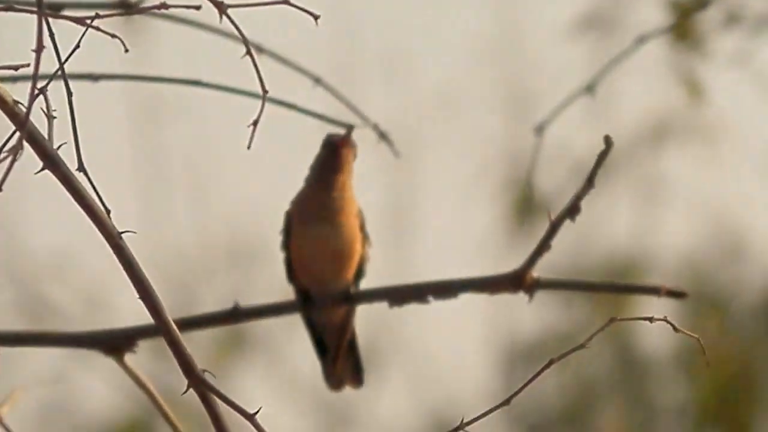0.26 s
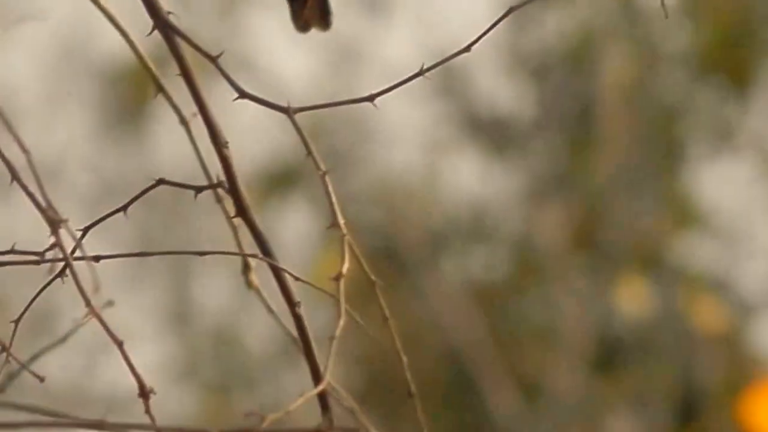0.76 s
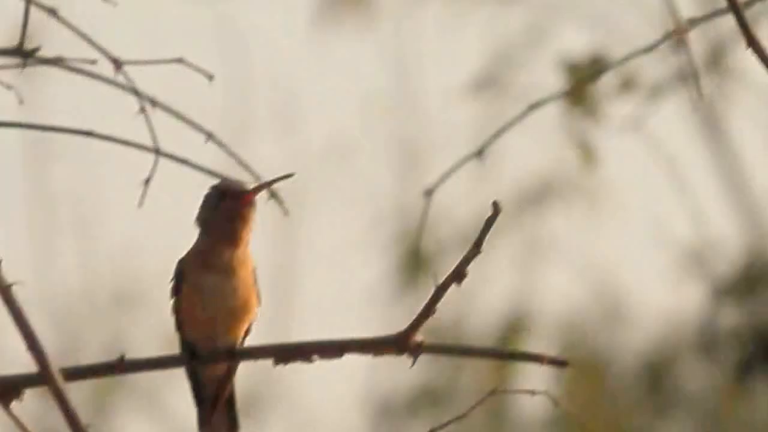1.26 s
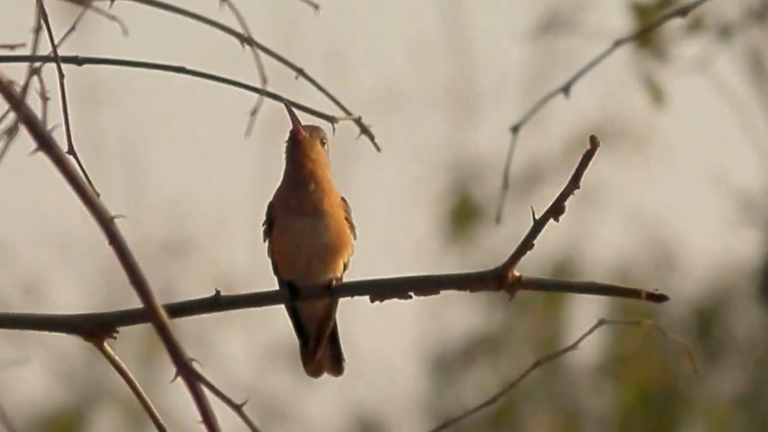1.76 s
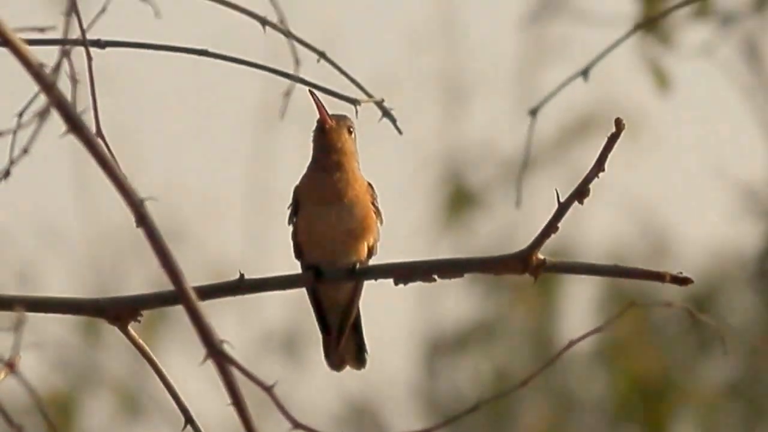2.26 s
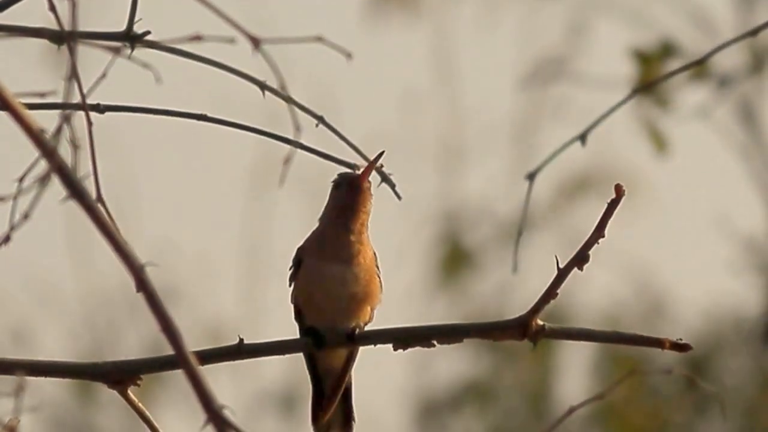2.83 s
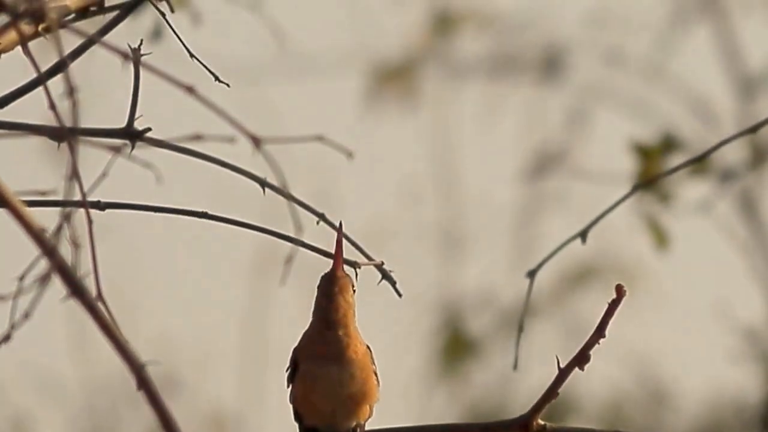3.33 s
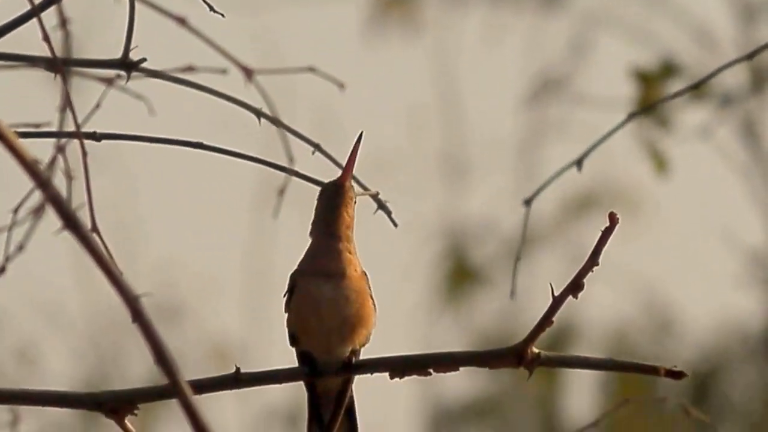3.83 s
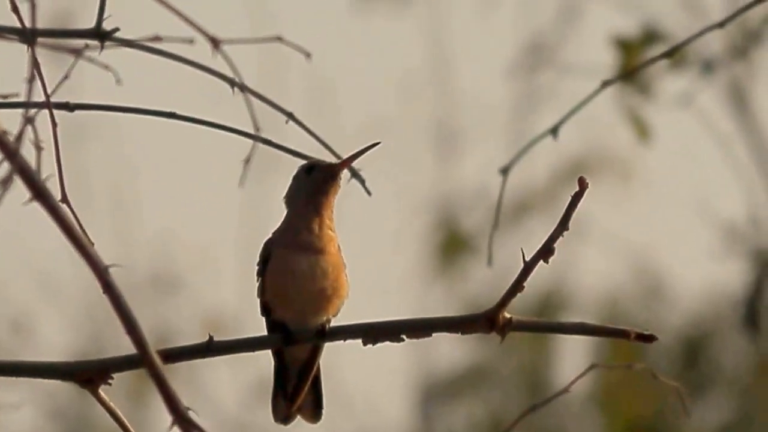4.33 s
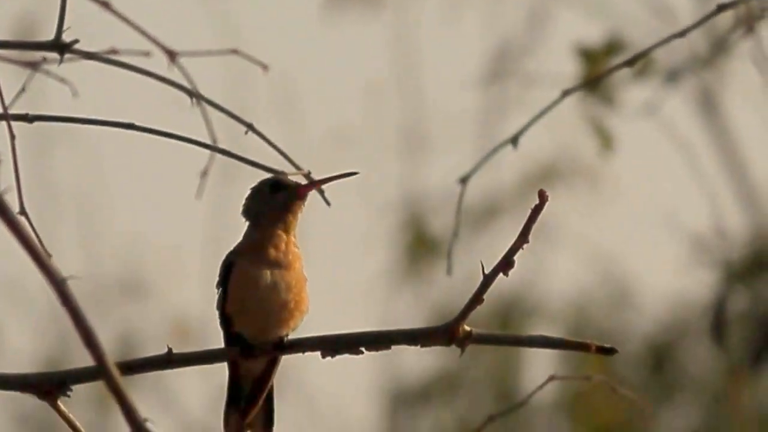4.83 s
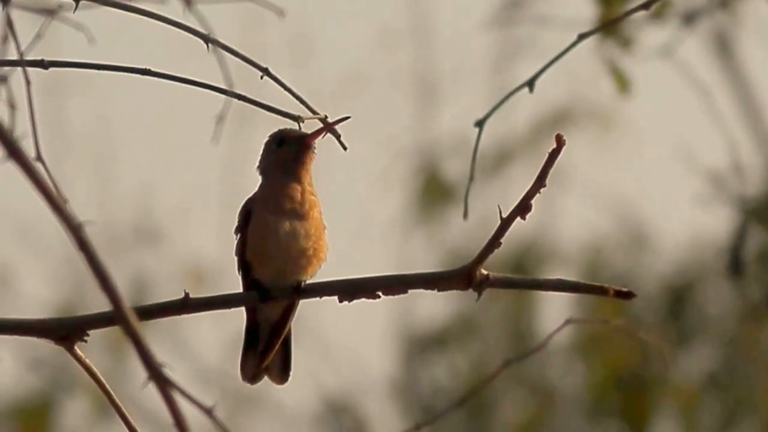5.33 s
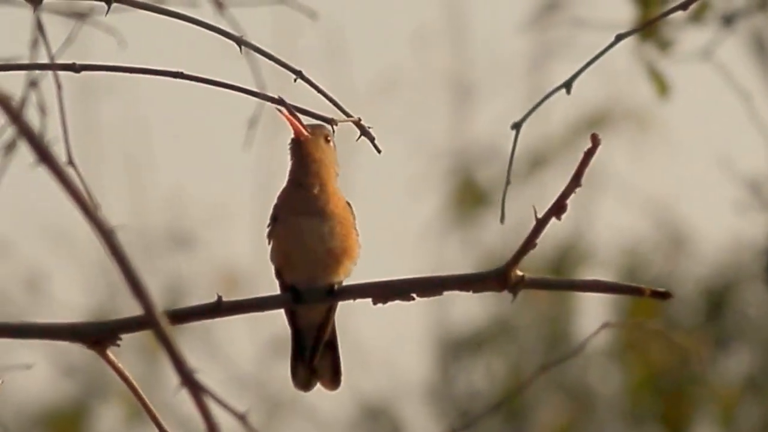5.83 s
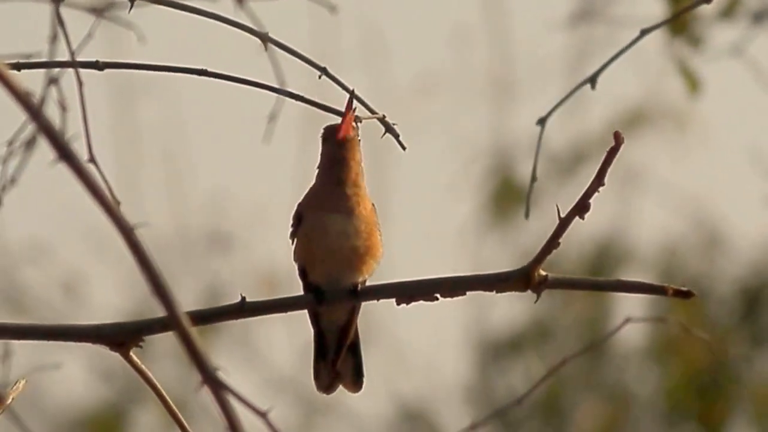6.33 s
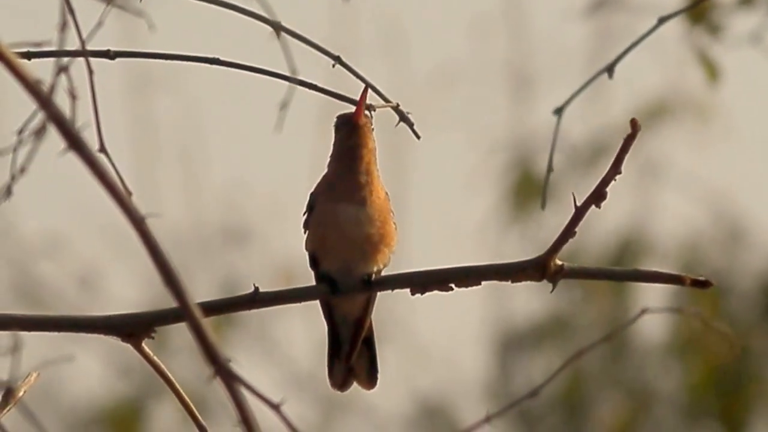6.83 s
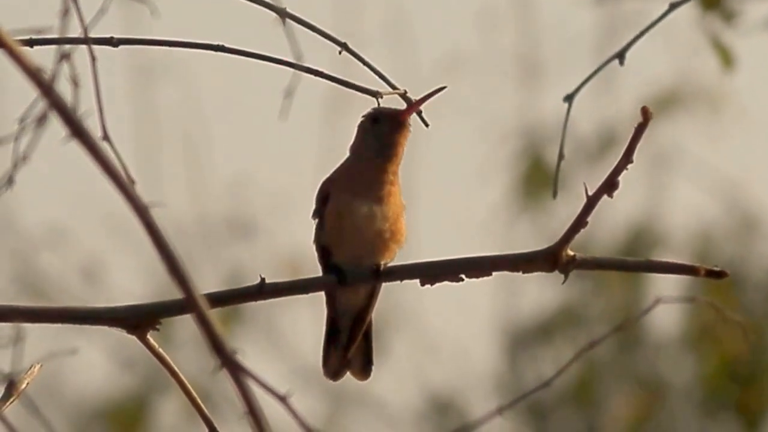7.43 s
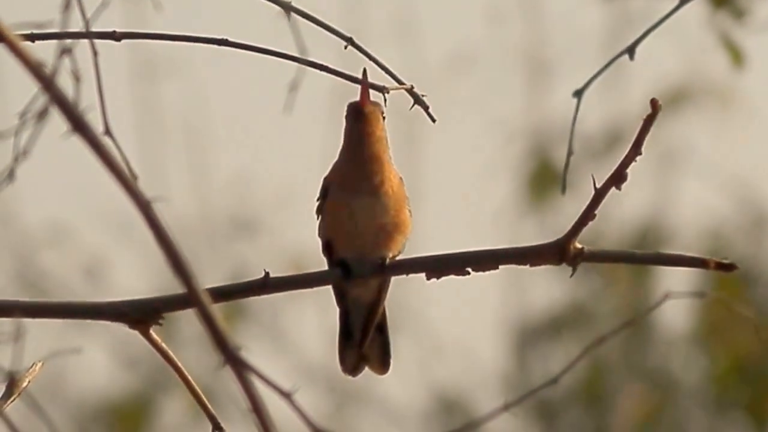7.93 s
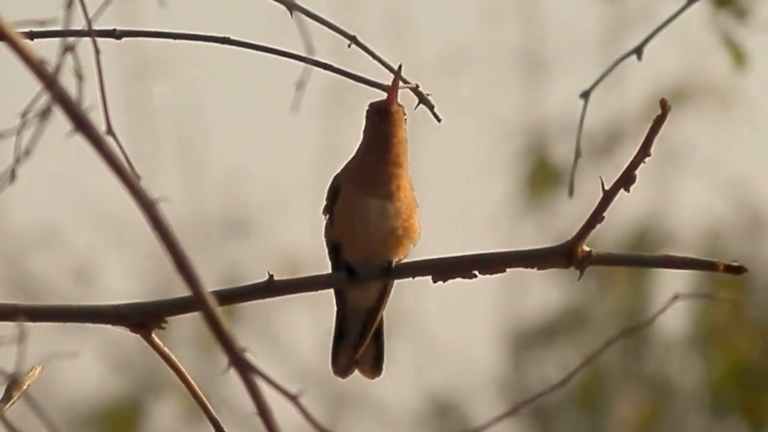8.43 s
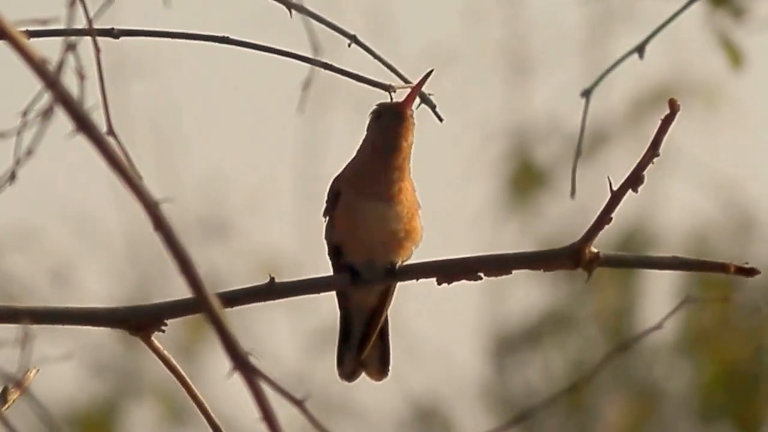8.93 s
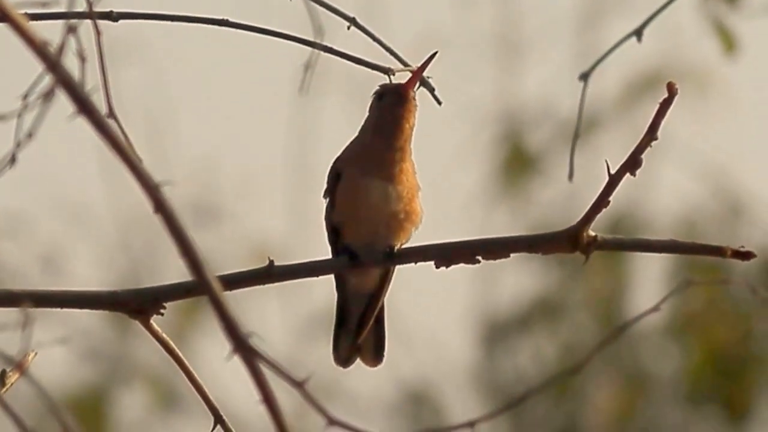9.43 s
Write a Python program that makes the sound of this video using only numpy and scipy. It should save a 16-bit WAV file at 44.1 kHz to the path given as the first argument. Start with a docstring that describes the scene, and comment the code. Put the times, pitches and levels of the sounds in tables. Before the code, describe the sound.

A steady low traffic rumble runs throughout outdoors, with a motor hum, a faint tyre whine and light hiss. In the first 0.7 seconds a nearby hummingbird gives a burst of sharp, falling, raspy high notes. A rising squeak comes at 1.3 seconds, then scattered chips until about 3.8, and three sharp downward notes between 4.1 and 5.2. Another squeak at 5.5 leads into the loudest part, a quick run of four two-part notes from 5.8 to 6.5. Afterwards only faint chips remain.

Farther off, other birds give high buzzes until about 3.4 seconds, buzzy warbles from 4 to 6.8, occasional thin whistles, and a faint nasal cry near 7.8. From about 4.5 seconds a distant engine pulls away, its low note climbing. Soft knocks on the hand-held camera's plastic case and a few dry ticks dot the first five seconds or so.

```python
"""Sharp hummingbird chips sound over a rumble of traffic; rising squeaks and a quick run of two-part
notes follow. The bird's syrinx makes gliding harmonics, which the resonances of its throat shape.
Other birds buzz, whistle and trill farther off, blurred by scattering from twigs and ground.
Motors hum, one engine pulls away as its firing rate climbs, and far tyres whine.
Soft knocks ring the plastic case of a hand-held camera, among a few dry ticks."""
import sys
import numpy as np
from scipy import signal
from scipy.fft import rfft, irfft, next_fast_len
from scipy.io import wavfile
from scipy.ndimage import map_coordinates

SR = 44100
rng = np.random.default_rng(int(sys.argv[2]) if len(sys.argv) > 2 else 0)


def pcm_store(signal):
    """Save signal as 16-bit PCM."""
    levels = np.round(np.clip(np.atleast_2d(signal), -1, 1) * 32767)
    wavfile.write(sys.argv[1], SR, levels.astype(np.int16).T)


N = 426447


def amp(db):
    """Decibels to amplitude ratio."""
    return 10 ** (np.asarray(db) / 20)


def gain_at(spectrum, hz):
    """Gain of a (frequency_hz, gain_db) curve, interpolated on a log frequency axis."""
    frequency_hz, gain_db = np.transpose(spectrum)
    return amp(np.interp(np.log(hz + 1), np.log(frequency_hz + 1), gain_db))


def curves(rows):
    """Linear interpolation, per sample, of each column after the time."""
    time_s, *columns = np.transpose(rows)
    return [np.interp(np.arange(N) / SR, time_s, column) for column in columns]


def wobble(rate, size=N):
    """Smooth random modulation with `rate` knots a second."""
    knots = rng.standard_normal(int(size * rate / SR) + 4)
    return map_coordinates(knots, [np.arange(size) * rate / SR])


def filtered(x, response):
    """Linear filtering: the spectrum is multiplied by a frequency response."""
    size = next_fast_len(len(x) + 8192)
    return irfft(rfft(x, size) * response(np.fft.rfftfreq(size, 1 / SR)), size)[:len(x)]


def noise(spectrum, size=N):
    """White noise filtered to a spectral shape, at rms 1."""
    coloured = filtered(rng.standard_normal(size), lambda hz: gain_at(spectrum, hz))
    return coloured / np.sqrt(np.mean(coloured ** 2) + 1e-20)


def phase_of(hz):
    """Phase is the time integral of frequency."""
    return 2 * np.pi * np.cumsum(hz) / SR


def add(track, start_s, sound):
    """Superpose a sound on the track."""
    start = max(round(start_s * SR), 0)
    track[start:start + len(sound)] += sound[:max(N - start, 0)]


def progress(length_s):
    """Normalised time u, from 0 to 1 over a note."""
    return np.linspace(0, 1, int(length_s * SR))


def envelope(u, attack, release, start_db, end_db):
    """Level in dB: a ramp, a hold at 0, a ramp; attack and release are shares of the note."""
    return start_db * np.clip(1 - u / attack, 0, 1) + end_db * np.clip(1 - (1 - u) / release, 0, 1)


def arc(u, start, middle, end):
    """A parabolic glide through three pitches."""
    return middle + (end - start) * (u - .5) + 2 * (start + end - 2 * middle) * (u - .5) ** 2


def bump(u, centre, width):
    """A Gaussian of height 1."""
    return np.exp(-((u - centre) / width) ** 2)


def warble(size, rate_hz, drift):
    """A sinusoidal modulator whose rate drifts at random."""
    return np.sin(phase_of(rate_hz * (1 + drift * wobble(41.7, max(size, SR))[:size])))


def syrinx(notes, harmonic_gain, flutter_rate, flutter_depth, shimmer_db, harmonics):
    """Harmonic notes (start_s, pitch_hz, level_db, roughness); roughness modulates pitch and level."""
    track = np.zeros(N)
    for start_s, pitch_hz, level_db, roughness in notes:
        size = len(pitch_hz)
        shake = lambda rate: roughness * wobble(rate, max(size, SR))[:size]
        hz = pitch_hz * np.exp(flutter_depth * shake(flutter_rate))
        t = np.arange(size) / SR
        fade = np.clip(np.minimum(t, t[::-1]) / 0.00025, 0, 1)
        strength = fade * amp(level_db + shimmer_db * shake(flutter_rate / 2))
        phase = phase_of(hz)
        tone = sum(harmonic_gain(k, k * hz) * (k * hz < SR / 2) * np.sin(k * phase)
                   for k in range(1, harmonics + 1))
        add(track, start_s, strength * tone)
    return track


def traffic():
    """Road rumble and tyre noise are broadband bands whose levels drift slowly."""
    # traffic strength: time_s, rumble_db, road_db
    levels = [(0, -33, -44.5), (1.4, -33.5, -43.5), (2.5, -35, -45), (4.2, -34, -44.5),
              (9.67, -33.5, -44.5)]
    # spectra of the rumble and the tyre noise: frequency_hz, gain_db
    rumble_spectrum = [(20, -21), (43, -8.5), (62, -1), (80, 2), (102, -6.5), (119, -3), (140, -2.5),
                       (170, -7), (200, -12.5), (315, -20), (520, -37.5), (900, -120)]
    road_spectrum = [(150, -4), (280, -1.5), (500, 0), (680, 1), (850, -1), (1100, -1.5), (1350, -8),
                     (1800, -7), (2600, -9.5), (4000, -18), (7000, -23.5), (16000, -37)]
    rumble_db, road_db = curves(levels)
    return amp(rumble_db - 1.5) * noise(rumble_spectrum) + amp(road_db + 0.5) * noise(road_spectrum)


def motor_drone():
    """A motor's periodic vibration radiates one low, slightly unsteady tone."""
    # course of the hum: time_s, pitch_hz, level_db
    hum = [(0, 131.4, -36.5), (1.9, 132.3, -38.5), (2.4, 131, -46), (4.6, 130, -47), (6.3, 135.5, -37),
           (7.2, 137.8, -37), (7.8, 141.5, -37.5), (8.9, 141.8, -39), (9.67, 142.6, -64)]
    pitch_hz, level_db = curves(hum)
    return amp(level_db + 0.54 * wobble(4)) * np.sin(phase_of(pitch_hz * (1 + 0.012 * wobble(12))))


def tyre_whine():
    """Tonal noise of far tyres: a wavering tone swells, with a fainter one on either side."""
    # course of the main tone: time_s, pitch_hz
    whine = [(0, 662), (1.3, 622), (1.8, 653), (2.15, 638), (2.35, 702), (2.8, 694), (3.1, 648), (3.8, 682),
             (4.0, 642), (4.25, 678), (4.45, 635), (4.65, 662), (5.3, 645), (9.0, 665), (9.25, 728)]
    lead_hz = curves(whine)[0] * (1 + .008 * wobble(7))
    swell_db = 4 * bump(np.arange(N) / SR, centre=3.6, width=1.6)
    sides = sum(amp(2 * wobble(2)) * np.sin(phase_of(hz * (1 + .02 * wobble(4)))) for hz in (585, 720))
    return amp(-54 + swell_db + 2 * wobble(6)) * np.sin(phase_of(lead_hz)) + amp(-57.5) * sides


def hiss():
    """Faint stationary noise, strongest near 9 kHz."""
    # shape of the hiss: frequency_hz, gain_db
    spectrum = [(1000, -8), (4000, -20), (6500, -14.5), (7300, -2), (8300, -3.5), (8900, 4), (9600, -3),
                (10500, -10.5), (13000, -19), (16000, -13)]
    return amp(-50) * noise(spectrum)


def hummingbird():
    """Source and filter: harmonics slide in turn through the resonance of throat and bill."""
    # throat response, open and narrowed: frequency_hz, gain_db
    open_throat = [(900, -38), (2000, -8.5), (3000, -17.5), (3700, -7), (4400, -4.5), (5600, -2.5),
                   (6600, -1), (7300, -18.5), (9000, -18.5), (12000, -29.5), (16000, -48)]
    narrow_throat = [(1000, -24), (2000, -16), (3700, -11.5), (4500, -5), (5600, 0), (6500, -2.5),
                     (7300, -17.5), (9000, -20), (16000, -33)]
    wide = lambda k, hz: gain_at(open_throat, hz)
    narrow = lambda k, hz: gain_at(narrow_throat, hz)
    clear = syrinx([*two_part_notes(), *squeaks()], wide,
                   flutter_rate=810, flutter_depth=0.082, shimmer_db=4.5, harmonics=5)
    hoarse = syrinx([*slurs(), *rasps()], wide,
                    flutter_rate=1400, flutter_depth=0.101, shimmer_db=2.5, harmonics=5)
    sharp = syrinx([*chips(), *chews()], narrow,
                   flutter_rate=900, flutter_depth=0.113, shimmer_db=10, harmonics=8)
    return clear + hoarse + sharp


def chips():
    """A steep downward sweep covers a wide band in an instant, so it sounds sharp."""
    # hummingbird chips: start_s, length_s, pitch_hz, level_db, sweep_depth
    notes = [(0.0, 0.028, 2720, -30, 0.45), (0.77, 0.012, 2710, -31.5, 0.44),
             (1.81, 0.021, 2810, -26.5, 0.68), (2.688, 0.037, 1570, -38, 0.83),
             (3.21, 0.016, 1685, -28, .82), (3.361, 0.016, 1270, -33.5, 0.98),
             (3.561, .035, 1526, -31.5, 0.91), (3.767, 0.034, 1557, -29, 0.92),
             (7.693, 0.043, 1280, -40.5, 0.94), (8.162, 0.028, 995, -50, 0.78)]
    for start_s, length_s, pitch_hz, level_db, sweep_depth in notes:
        u = progress(length_s)
        glide = 1.9 * np.exp(-u / 0.09) - 0.63 * u
        shape_db = 7 + envelope(u, attack=0.23, release=0.88, start_db=-4.5, end_db=-25)
        yield start_s, pitch_hz * np.exp(sweep_depth * glide), level_db + shape_db, 0.073 + .5 * u


def slurs():
    """Short falling glides; random modulation makes some of them hoarse."""
    # hummingbird slurs: start_s, length_s, start_hz, middle_hz, end_hz, level_db, roughness
    notes = [(0.058, 0.049, 3050, 2920, 2070, -18, 0.04), (0.496, 0.023, 3830, 2855, 2600, -16, 0.55),
             (0.553, 0.0287, 5370, 4580, 4500, -28, 0.3), (3.205, 0.014, 6100, 5900, 5900, -27.5, 0)]
    for start_s, length_s, *pitches_hz, level_db, roughness in notes:
        u = progress(length_s)
        shape_db = envelope(u, attack=0.31, release=0.42, start_db=-14.5, end_db=-16)
        yield start_s, arc(u, *pitches_hz), level_db + shape_db, roughness


def neighbours(notes, overtone_db=-24):
    """The birds in the scrub sound a fundamental and a weaker second harmonic."""
    return syrinx(notes, lambda k, hz: amp(overtone_db * (k - 1)),
                  flutter_rate=700, flutter_depth=0.084, shimmer_db=6, harmonics=2)


def buzzes():
    """A fluttering pitch approaches its top exponentially from below."""
    # a neighbour's high buzzes: start_s, length_s, top_hz, level_db
    notes = [(0.335, 0.13, 6180, -34.5), (0.482, 0.045, 6330, -35), (0.551, 0.084, 6330, -40),
             (1.354, 0.145, 5930, -36), (1.518, 0.057, 6170, -34), (1.58, 0.049, 6670, -35),
             (2.203, 0.11, 6070, -35), (2.383, 0.037, 5860, -37), (2.487, 0.087, 6200, -53),
             (2.63, .04, 5900, -49), (2.82, .06, 5950, -52), (3.197, 0.1, 5850, -36.5),
             (3.379, 0.046, 5730, -39)]
    for start_s, length_s, top_hz, level_db in notes:
        u = progress(length_s)
        pitch_hz = top_hz * (1 - 0.21 * np.exp(-u / 0.4)) * np.exp(.008 * wobble(69, len(u)))
        shape_db = envelope(u, attack=0.2, release=0.19, start_db=-10, end_db=-13)
        yield start_s, pitch_hz, level_db + shape_db, .2


def camera():
    """Knocks excite damped modes of the plastic case; ticks are bare bursts of decaying noise."""
    # impacts on the body: start_s, ring_db, crack_db
    knocks = [(0.386, -24, -33), (0.487, -29, -39), (0.57, -29, -45), (1.257, -31, -40),
              (1.289, -30.5, -49), (1.468, -28.5, -38), (1.603, -29.5, -40), (2.759, -30.5, -43),
              (2.988, -32.5, -46), (3.299, -28, -43.5), (3.385, -34, -46), (4.715, -30.5, -49),
              (5.242, -30, -47)]
    # modes of the case: pitch_hz, gain_db, t60_s
    modes = [(424, -1.5, 0.055), (472, -4.5, 0.05), (940, -9, 0.012)]
    # dry ticks: start_s, peak_db
    ticks = [(2.06, -32), (3.386, -22), (3.963, -23), (4.001, -24), (4.025, -17.5), (5.259, -23.5)]
    # spectrum of a crack: frequency_hz, gain_db
    crack_spectrum = [(300, -25), (1200, -1), (1800, 4), (3300, 6.5), (4500, -6), (9000, -35), (16000, -37)]
    track, t = np.zeros(N), np.arange(SR // 8) / SR
    burst = lambda t60_s: noise(crack_spectrum, len(t)) * amp(-60 * t / t60_s)
    for start_s, ring_db, crack_db in knocks:
        ring = sum(amp(db - 60 * t / t60_s) * np.sin(2 * np.pi * hz * (1 + 0.0077 * rng.normal()) * t)
                   for hz, db, t60_s in modes)
        add(track, start_s + 0.00104, amp(ring_db) * ring + amp(crack_db + 6.5) * burst(t60_s=0.023))
    for start_s, peak_db in ticks:
        crack = burst(t60_s=0.0065)
        add(track, start_s, amp(peak_db) * crack / np.abs(crack).max())
    return track


def rasps():
    """Fast, wide frequency modulation spreads a rising note into rasping sidebands."""
    # hummingbird rasps: start_s, length_s, pitch_hz, level_db
    notes = [(0.514, 0.028, 2970, -22), (0.565, 0.044, 2750, -27), (0.594, 0.059, 3090, -23.5)]
    for start_s, length_s, pitch_hz, level_db in notes:
        u = progress(length_s)
        glide = 0.168 * (u - .5) + 0.11 * warble(len(u), rate_hz=370, drift=0.076)
        shape_db = envelope(u, attack=0.34, release=0.41, start_db=-3, end_db=-19)
        yield start_s, pitch_hz * np.exp(glide), level_db + shape_db, 1


def scoops():
    """A nearly pure tone sinks into a dip in frequency and partly recovers."""
    # low whistles: start_s, length_s, pitch_hz, level_db
    notes = [(0.688, 0.15, 3010, -49), (7.134, .16, 2990, -45.5)]
    for start_s, length_s, pitch_hz, level_db in notes:
        u = progress(length_s)
        glide = -.09 * u - 0.19 * bump(u, centre=0.81, width=0.21)
        shape_db = envelope(u, attack=0.11, release=0.36, start_db=-5, end_db=-3)
        yield start_s, pitch_hz * np.exp(glide), level_db + shape_db, .05


def whistles():
    """Nearly pure tones follow parabolic glides as they swell or fade."""
    # whistles in the scrub: start_s, length_s, start_hz, middle_hz, end_hz, level_db, swell_db
    notes = [(0.871, 0.18, 6280, 5170, 4500, -47, -21), (3.683, 0.095, 3750, 3200, 2800, -47, 8),
             (3.78, 0.24, 2830, 2690, 2710, -52.5, 3), (3.991, 0.11, 4240, 4500, 3850, -46.5, 5),
             (4.48, .06, 3870, 3275, 2900, -44.5, -7), (4.549, 0.21, 2860, 2690, 2620, -48.5, -3),
             (5.785, 0.18, 6560, 5380, 4700, -49, -4), (8.266, 0.014, 2424, 2570, 2750, -44, -2)]
    for start_s, length_s, *pitches_hz, level_db, swell_db in notes:
        u = progress(length_s)
        shape_db = swell_db * (u - .5) + envelope(u, attack=0.094, release=0.35, start_db=-6, end_db=2)
        yield start_s, arc(u, *pitches_hz), level_db + shape_db, .08


def squeaks():
    """A piecewise linear sweep: a slow climb breaks at a knee into a louder flick, then sags."""
    # hummingbird squeaks: start_s, climb_s, start_hz, knee_hz, level_db, sag_s
    notes = [(1.270, .077, 3550, 4640, -26, 0.012), (5.497, 0.067, 4040, 4550, -22.5, .014)]
    flick_s, top_hz, sag_hz_per_s = .025, 6750, 63000
    for start_s, climb_s, start_hz, knee_hz, level_db, sag_s in notes:
        corners_s = np.cumsum([0, climb_s, flick_s, sag_s])
        corners_hz = [start_hz, knee_hz, top_hz, top_hz - sag_hz_per_s * sag_s]
        u = progress(corners_s[-1])
        pitch_hz = np.interp(u * corners_s[-1], corners_s, corners_hz) * np.exp(.017 * wobble(120, len(u)))
        accent_db = 5 * bump(u, centre=0.84, width=.13)
        shape_db = envelope(u, attack=.02, release=.05, start_db=-4, end_db=-15)
        yield start_s, pitch_hz, level_db + accent_db + shape_db, .15


def flicks():
    """A very high sweep shoots up and levels off exponentially."""
    # thin flicks: start_s, length_s, top_hz, level_db
    notes = [(2.043, 0.03, 8430, -34.5), (7.512, 0.025, 10500, -42), (9.163, 0.031, 10790, -43)]
    for start_s, length_s, top_hz, level_db in notes:
        u = progress(length_s)
        shape_db = envelope(u, attack=.15, release=0.62, start_db=-1, end_db=-13)
        yield start_s, top_hz * (1 - .42 * np.exp(-u / 0.19)), level_db + shape_db, .15


def triller():
    """Joint amplitude and frequency modulation chops a far bird's note into a rattle."""
    start_s, length_s, pitch_hz, level_db, pulse_hz = 2.16, .15, 2600, -42, 66
    t = np.arange(N) / SR - start_s
    swell = np.sqrt(np.clip(4 * t / length_s * (1 - t / length_s), 0, 1))
    pulse = np.sin(np.pi * pulse_hz * t) ** 2
    return amp(level_db) * swell * pulse * np.sin(phase_of(pitch_hz * (0.83 + 0.22 * pulse)))


def held_whistles():
    """An onset glide rises into a long tone of almost constant frequency."""
    # long whistles: start_s, length_s, pitch_hz, level_db
    notes = [(3.366, .37, 4030, -44), (8.933, .35, 3955, -43.5)]
    for start_s, length_s, pitch_hz, level_db in notes:
        u = progress(length_s)
        glide = -.17 * np.exp(-u / 0.04) - .11 * (u - .55) ** 2
        shape_db = envelope(u, attack=0.41, release=0.28, start_db=-9, end_db=-5.5)
        yield start_s, pitch_hz * np.exp(glide), level_db + shape_db, .06


def chorus():
    """Frequency modulation too fast for the ear to follow makes overlapping arches buzz."""
    # far calls: start_s, length_s, start_hz, middle_hz, end_hz, level_db, warble_depth
    notes = [(4.01, .21, 3050, 3150, 3195, -43.5, 0.036), (4.137, 0.31, 3140, 3330, 3080, -46, 0.097),
             (4.25, 0.21, 2750, 2880, 2720, -44, 0.039), (4.461, 0.17, 3090, 3290, 3400, -38, 0.039),
             (4.6, .25, 3420, 3405, 2780, -45, 0.115), (4.964, 0.17, 2790, 3330, 2860, -38.5, 0.055),
             (5.038, 0.16, 3380, 3436, 3240, -47, 0.092), (5.318, 0.22, 3230, 3133, 2750, -45, 0.11),
             (5.482, 0.17, 3130, 3405, 3410, -38.5, 0.077), (5.676, 0.2, 3050, 3330, 2818, -42.5, .05),
             (5.982, 0.25, 2960, 2985, 2740, -48.5, 0.13), (6.236, 0.29, 2930, 3090, 2880, -49, 0.12),
             (6.652, 0.12, 2910, 3090, 2880, -50, 0.074)]
    for start_s, length_s, *pitches_hz, level_db, warble_depth in notes:
        u = progress(length_s)
        swing = warble_depth * warble(len(u), rate_hz=170, drift=0.035)
        shape_db = envelope(u, attack=0.19, release=0.24, start_db=-7, end_db=-1)
        yield start_s, arc(u, *pitches_hz) * np.exp(swing), level_db + shape_db, .15


def chews():
    """The frequency falls exponentially to a shelf, then sags off it."""
    # hummingbird "chew" notes: start_s, shelf_hz, level_db
    notes = [(4.096, 2008, -21), (4.784, 1904, -22.5), (5.185, 1950, -25)]
    u = progress(length_s=.06)
    glide = 1.5 * np.exp(-u / .08) - 0.49 * u ** 4.4
    accent_db = 6 * bump(u, centre=0.084, width=0.11)
    shape_db = envelope(u, attack=0.067, release=0.37, start_db=-1, end_db=-18) - 5.5
    for start_s, shelf_hz, level_db in notes:
        yield start_s, shelf_hz * np.exp(glide), level_db + accent_db + shape_db, 0.13 + 0.16 * u ** 2


def engine():
    """Periodic firing makes a harmonic series that rises as the engine pulls away."""
    # course of the engine: time_s, firing_hz, level_db
    pull_away = [(4.5, 29.7, -58), (4.8, 38.25, -41), (5.1, 49.7, -41), (5.5, 56.13, -36.5),
                 (6.1, 61.64, -37.5), (6.7, 67.6, -40.5), (7.3, 70.9, -42.5), (7.8, 75.1, -34),
                 (8.3, 77.94, -41), (8.6, 77.6, -47), (9.1, 76.1, -38.5), (9.67, 78.85, -33.5)]
    firing_hz, level_db = curves(pull_away)
    phase = phase_of(firing_hz * (1 + 0.0078 * wobble(9)))
    tone = np.sin(phase) + amp(-12.5) * np.sin(2 * phase) + amp(-18.5) * np.sin(3 * phase)
    return amp(level_db + 3.5 + 1.2 * wobble(9.9)) * tone


def two_part_notes():
    """A frequency jump joins two glides: a drop onto a held pitch, then a lower dip that frays."""
    # the hummingbird's run: start_s, drop_s, drop_hz, drop_db, drop_depth, tilt_db,
    # dip_s, dip_hz, dip_db, lowest_share
    notes = [(5.824, 0.058, 4297, -13.5, 0.58, -12, 0.042, 2860, -17, 0.24),
             (6.026, 0.059, 4060, -20, 0.36, 0, 0.045, 2900, -16.5, 0.295),
             (6.217, 0.055, 3960, -17.5, 0.31, 0, 0.044, 2667, -18.5, 0.47),
             (6.396, 0.064, 3680, -21.5, 0.6, 4, 0.04, 2540, -20.5, 0.26)]
    for start_s, drop_s, drop_hz, drop_db, depth, tilt_db, dip_s, dip_hz, dip_db, lowest in notes:
        u = progress(drop_s)
        glide = depth * np.exp(-u / 0.085) - 0.024 * u ** 2
        shape_db = tilt_db * u + envelope(u, attack=0.033, release=0.37, start_db=-9, end_db=-18)
        yield start_s, drop_hz * np.exp(glide), drop_db + shape_db, .14
        u = progress(dip_s)
        fall = np.clip(1 - u / lowest, 0, 1)
        rise = np.clip((u - lowest) / (1 - lowest), 0, 1)
        glide = .29 * fall ** 2 + 0.18 * np.sin(np.pi / 2 * rise) ** 2
        shape_db = envelope(u, attack=.15, release=.45, start_db=-4, end_db=-5)
        yield start_s + drop_s, dip_hz * np.exp(glide), dip_db + shape_db, .16 + .4 * u ** 4


def twitter(start_s, end_s, count):
    """Faint sweeps, up or down, arrive at random times from far back in the scrub."""
    for when, long, high, loud, slope in rng.random((count, 5)):
        u = progress(0.016 + 0.023 * long)
        pitch_hz = 2600 * 2.2 ** high * np.exp(0.3 * (slope - .6) * (.4 - u))
        shape_db = envelope(u, attack=0.15, release=0.72, start_db=-12, end_db=-32)
        yield start_s + (end_s - start_s) * when, pitch_hz, -53 + 4 * loud - 4 * high + shape_db, .3


def crier():
    """Strong harmonics make a distant cry nasal; a spike of effort lifts its pitch and level."""
    # nasal resonances: frequency_hz, gain_db
    nasal = [(1700, -8.5), (2500, -11.5), (3700, -6.5), (5200, -12), (7000, -10), (9000, -22)]
    start_s, length_s, pitch_hz, level_db = 7.79, .315, 1755, -41
    u = progress(length_s)
    effort = .45 * bump(u, .29, .055) + .55 * bump(u, .33, .16) - .45 * np.exp(-u / .08) - .1 * u ** 2
    note = start_s, pitch_hz * np.exp(.35 * effort), level_db + 8 * effort - 24 * (u - .5) ** 2, .3
    return syrinx([note], lambda k, hz: gain_at(nasal, hz),
                  flutter_rate=190, flutter_depth=0.038, shimmer_db=4, harmonics=4)


def pip():
    """The pitch snaps up and holds for an instant; a strong second harmonic makes it bright."""
    start_s, length_s, top_hz, level_db = 8.2415, .017, 3380, -35
    u = progress(length_s)
    glide = -.7 * np.exp(-u / 0.063)
    shape_db = envelope(u, attack=0.18, release=0.64, start_db=-25, end_db=-9)
    return neighbours([(start_s, top_hz * np.exp(glide), level_db + shape_db, .25)], overtone_db=-2.5)


def reflection(x, delay_s, gain_db):
    """Interference: one delayed copy beats against each sweep."""
    return x + amp(gain_db) * np.pad(x, (round(delay_s * SR), 0))[:N]


def scrub(x, wet_db, t60_s):
    """Scattering from twigs and ground adds an exponentially decaying tail."""
    t = np.arange(SR // 2) / SR
    tail = rng.standard_normal(len(t)) * amp(-60 * t / t60_s) * (t > .002)
    return x + amp(wet_db) * signal.fftconvolve(x, tail / np.linalg.norm(tail))[:N]


def scene():
    """The sources superpose; more reverberation against the direct sound makes a bird seem farther."""
    calls = reflection(hummingbird(), delay_s=.0065, gain_db=-13)
    calls = calls + crier() + triller() + neighbours(flicks()) + pip()
    birds = scrub(calls, wet_db=-14.5, t60_s=0.29)
    faint = [*twitter(6.6, 8.2, count=35), *twitter(8.28, 8.95, count=50)]
    birds += scrub(neighbours([*whistles(), *scoops()]), wet_db=-3, t60_s=0.37)
    birds += scrub(neighbours(chorus()), wet_db=-1.5, t60_s=0.53)
    birds += scrub(neighbours(held_whistles()), wet_db=-10, t60_s=0.87)
    birds += scrub(neighbours([*buzzes(), *faint], overtone_db=-21), wet_db=-1.5, t60_s=0.79)
    road = traffic() + engine() + motor_drone() + tyre_whine()
    return (birds + road + camera() + hiss())[None]


def record(dry):
    """The microphone's frequency response has a deep notch near 8 kHz and a band limit."""
    limit_hz = 15950
    response = lambda hz: amp(-24 * bump(hz, centre=7880, width=310)) * (hz < limit_hz)
    return filtered(dry[0], response)[None]


dry = scene()
out = record(dry)
pcm_store(out)
```